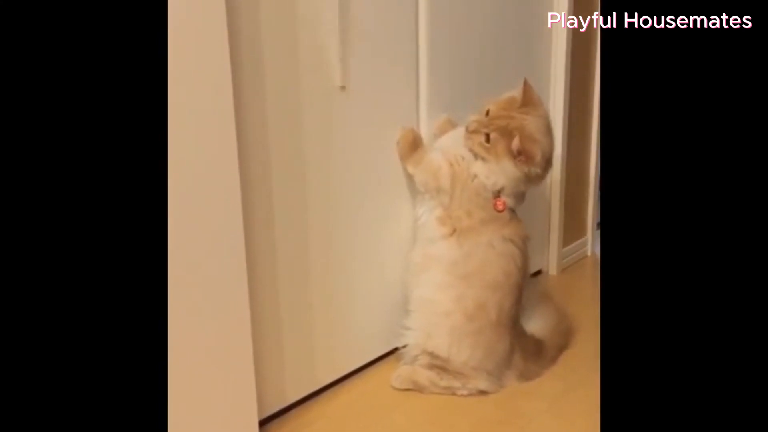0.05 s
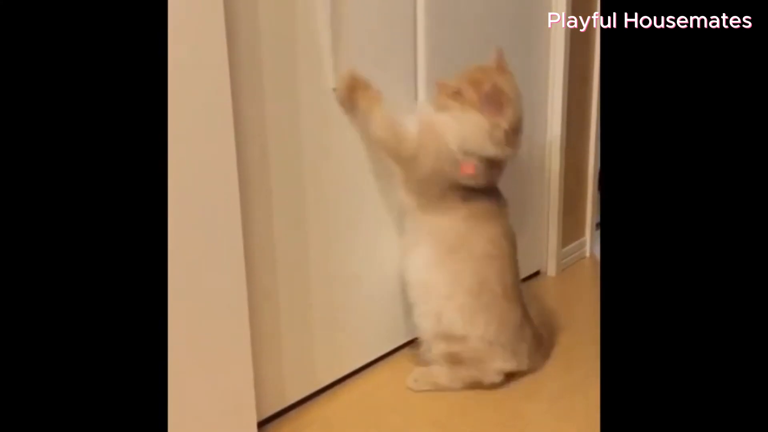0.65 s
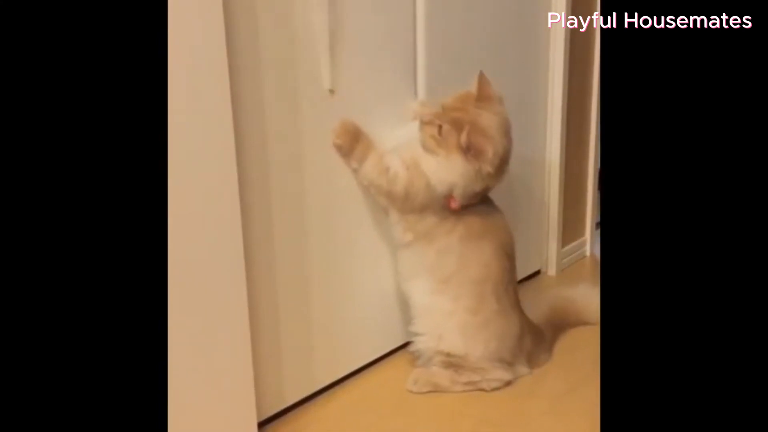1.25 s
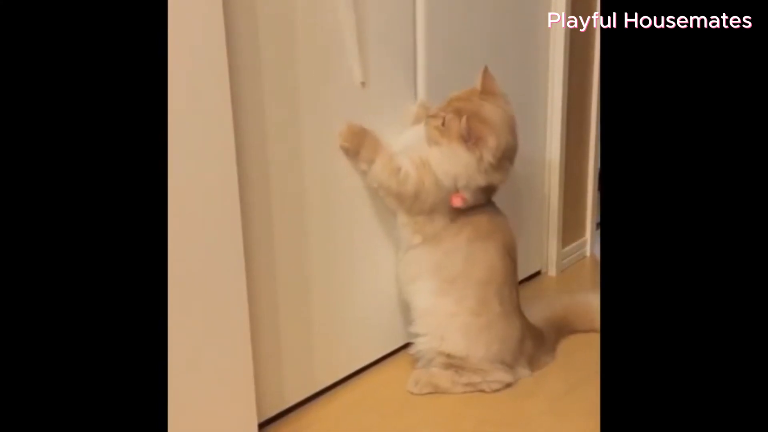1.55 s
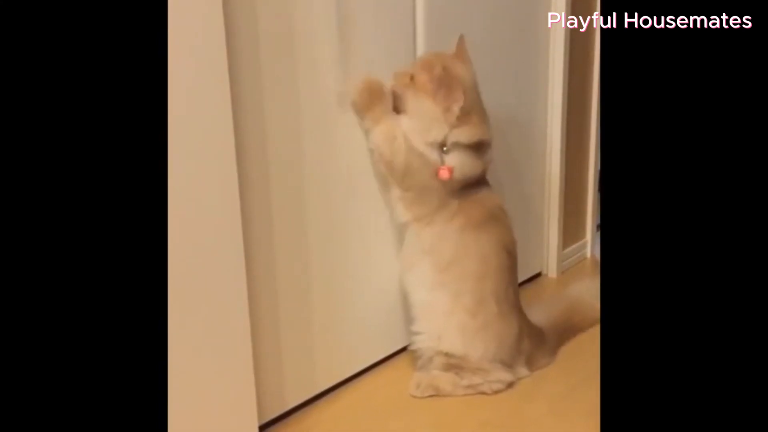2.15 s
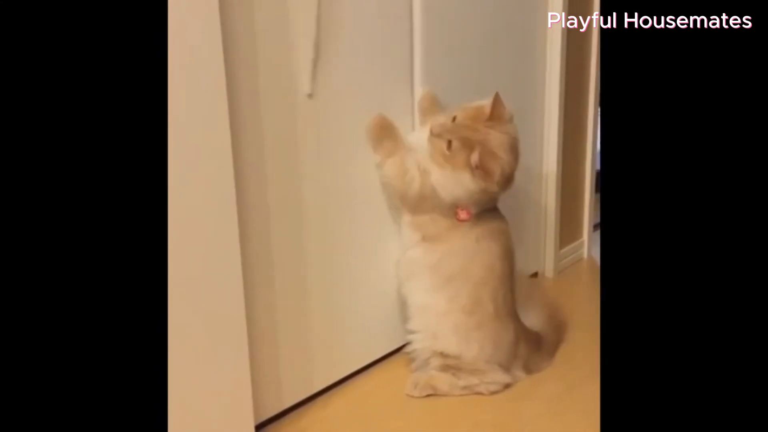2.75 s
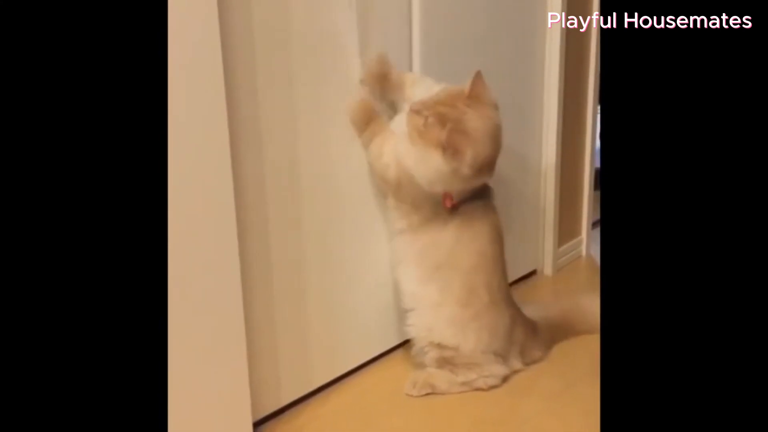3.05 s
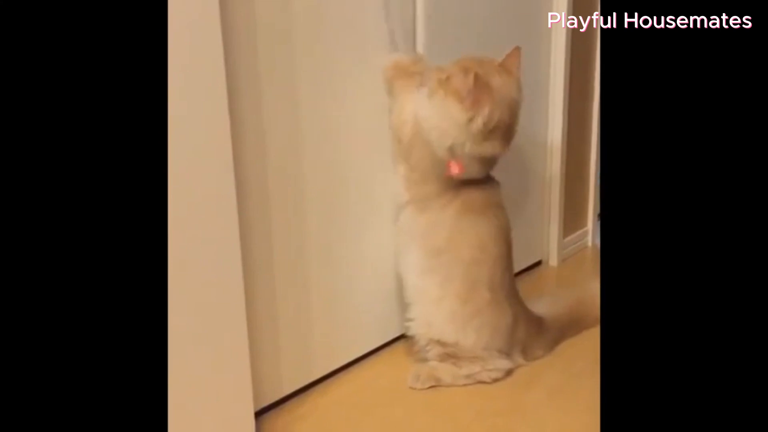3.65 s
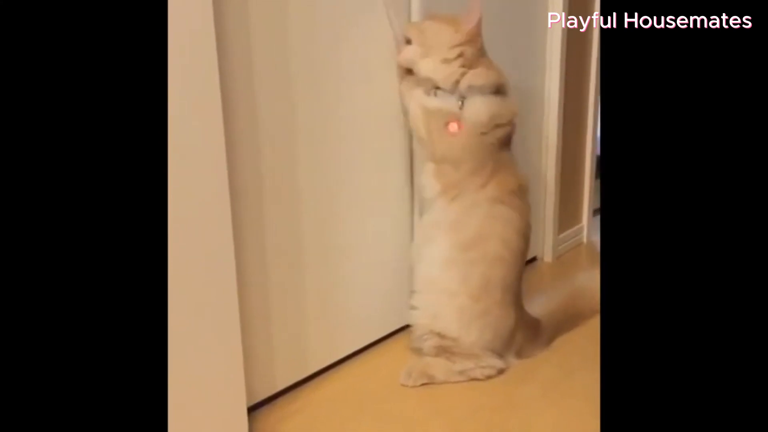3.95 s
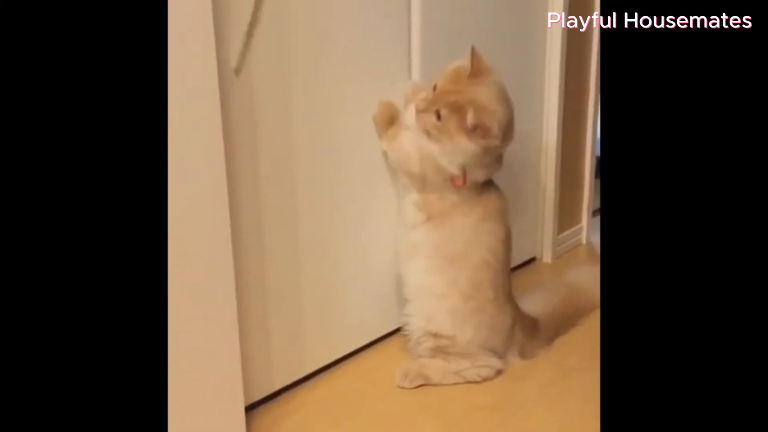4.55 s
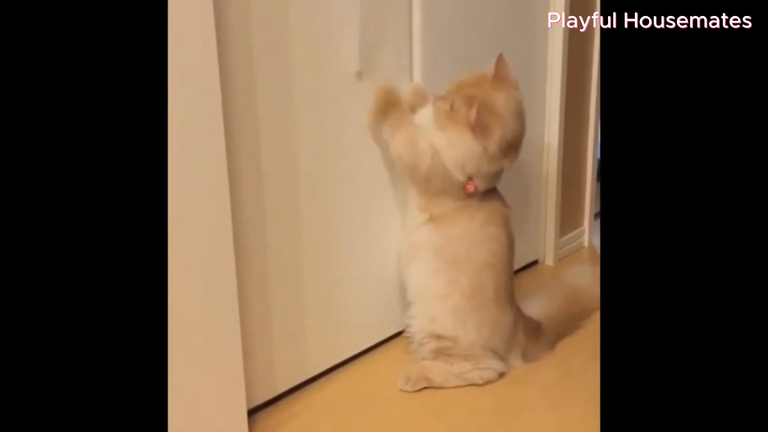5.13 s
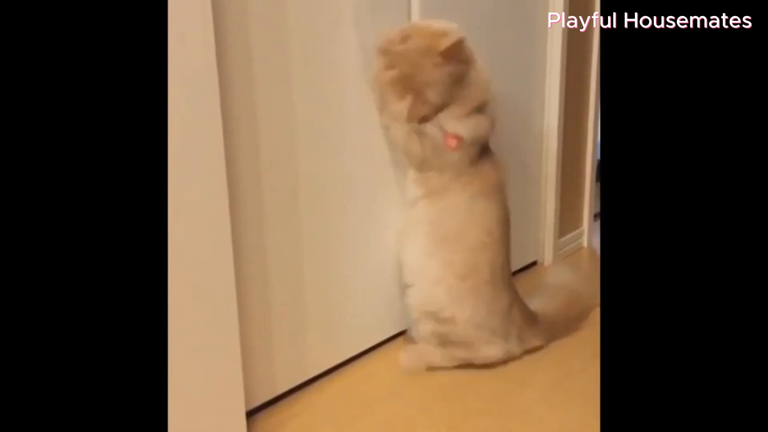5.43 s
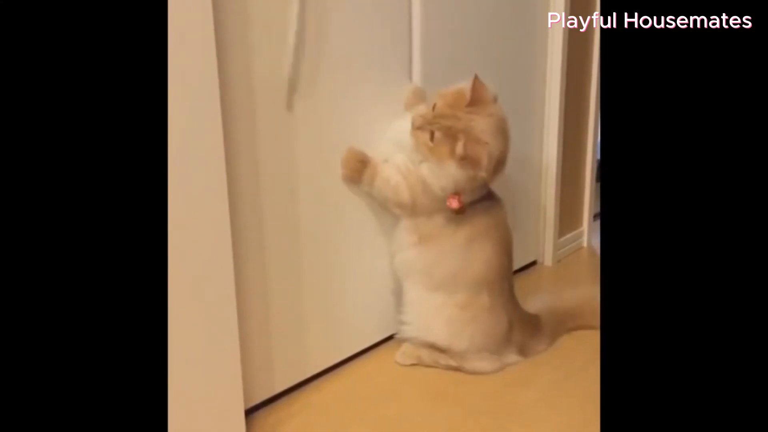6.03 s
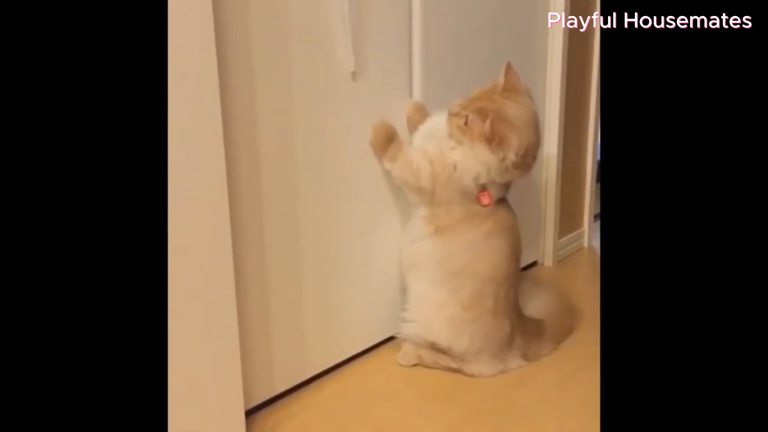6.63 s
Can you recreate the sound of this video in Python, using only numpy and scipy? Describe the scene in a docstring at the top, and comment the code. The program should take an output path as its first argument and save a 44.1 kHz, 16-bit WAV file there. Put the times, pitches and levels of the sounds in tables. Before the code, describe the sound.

A cat paws at a closet door in a small room, close to the microphone. Its claws scrape briefly and the hollow panel knocks in its track. A tiny, high collar bell rattles, then jingles freely in bursts among the knocks, then goes back to dull little rattles. Near the end a claw plucks the door's edge sharply three times. An appliance hums faintly throughout.

```python
"""A small room, one microphone near a closet door; an appliance hums under faint room noise throughout.
A cat starts pawing at the door: claws stick and slip, and the hollow panel knocks in its track.
From about 2 to 5 s the pellet bell on its collar swings free and rings among the knocks and scrapes.
Then it only rattles, as it does whenever it is pressed into the fur.
Towards the end a claw plucks the door's edge hard, three times."""
import sys
import numpy as np
from scipy import signal
from scipy.fft import rfft, irfft
from scipy.io import wavfile
from scipy.ndimage import uniform_filter1d

SR = 44100
rng = np.random.default_rng(int(sys.argv[2]) if len(sys.argv) > 2 else 0)


def dump(signal):
    """Clip the signal to [-1, 1] and save it as 16-bit WAV at the path in sys.argv[1]."""
    limited = np.clip(np.atleast_2d(signal).T, -1, 1)
    pcm = np.round(limited * 32767).astype(np.int16)
    wavfile.write(sys.argv[1], SR, pcm)


N = 303840
TIME = np.arange(N) / SR
AGE = TIME[:SR // 2]  # seconds since a blow
MIDDLE_S = AGE.mean()

# Paws knock the door. Each row: start in seconds, levels of clack, panel thump and hollow body in dB,
# t60 in seconds, clack centre in Hz.
KNOCKS = [(0.778, -55.5, -74, -83, 0.085, 1440), (0.9102, -47.5, -51.5, -58.5, 0.097, 1470),
          (0.9954, -52.5, -43.5, -55.5, 0.13, 1270), (1.7884, -47.5, -43, -58.5, 0.3, 1390),
          (1.9993, -29.5, -42.5, -38, 0.074, 1560), (2.2775, -50, -71, -62, 0.049, 2480),
          (2.4369, -51.5, -90, -60, 0.069, 2280), (3.1871, -31.5, -45, -46, 0.15, 1870),
          (3.713, -45.5, -80, -56.5, 0.037, 1900), (4.0068, -34.5, -47.5, -44, 0.051, 1830),
          (4.066, -48.5, -59, -58, 0.077, 1400), (4.5107, -72, -60, -74, .1, 2120),
          (4.6806, -40, -67, -52, 0.068, 1820), (4.994, -52, -93, -73, 0.075, 2420),
          (5.6174, -33.5, -60, -49, 0.037, 1520), (5.8257, -58, -57.5, -70.5, 0.22, 2000)]
# A paw drags over the door. Each row: strongest pull in seconds, build-up in seconds,
# levels of edge ring and claw rasp in dB.
SCRAPES = [(0.196, 0.12, -69, -96), (0.709, 0.011, -65.5, -88), (.826, 0.023, -51, -52),
           (0.914, 0.011, -52.5, -51.5), (1.45, 0.068, -69, -78), (1.824, 0.018, -57, -44.5),
           (1.908, 0.025, -55.5, -44.5), (2.93, 0.085, -78, -67.5), (3.056, 0.012, -43, -42),
           (3.091, 0.018, -58, -46), (3.382, 0.011, -54.5, -54), (3.576, 0.036, -61, -57.5),
           (3.691, 0.027, -72, -63.5), (4.074, 0.017, -51.5, -74), (5.411, 0.023, -75, -66),
           (5.81, 0.048, -67, -63), (6.87, 0.0098, -56, -58)]
# Single blows. Each row: start in seconds, level in dB.
PLUCKS = [(1.463, -37), (5.616, -24.5), (6.4173, -20.5), (6.8634, -24.5)]  # a claw on the door's edge
BUMPS = [(1.016, -51), (2.018, -58), (3.196, -53), (4.022, -60)]  # the whole door against its track
BELL_STRIKES = [(1.8154, -38.5), (1.879, -40.5), (2.0593, -34.5), (2.2074, -43.5), (3.2404, -38),
                (3.2795, -38), (3.297, -33.5), (3.3508, -38), (3.4083, -37.5), (3.475, -48),
                (3.5955, -43.5), (3.7315, -37.5), (3.7757, -41.5), (3.8332, -40), (3.9902, -39.5),
                (4.0306, -37.5), (4.1037, -32.5), (4.1351, -36), (4.1706, -42), (4.195, -33), (4.2581, -44),
                (4.384, -45.5), (4.7393, -40), (4.786, -47.5), (4.881, -45)]  # the pellet on the free shell
# The pellet rattles in the damped bell. Each row: start in seconds, length in seconds, level in dB.
RATTLES = [(0.708, .01, -63), (0.9835, .045, -58.5), (2.4, .01, -62), (3.033, .01, -45), (3.0974, .01, -44),
           (3.3842, .01, -54), (3.55, .01, -61), (4.418, .01, -58.5), (4.58, .01, -53.5), (4.636, .01, -60),
           (4.86, .01, -56.5), (5.288, .065, -58), (5.398, .01, -60), (5.588, .045, -55.5),
           (5.7075, .055, -40.5), (5.8274, .025, -40), (5.9976, .045, -49), (6.538, .01, -66),
           (6.63, .01, -61.5)]
# The free bell's changing brightness. Each row: time in seconds, then first overtone, second overtone
# and chatter in dB against the main tone.
OVERTONES = [(1.85, -28, -30, -34), (2.06, -24, -11.5, -14), (2.21, -30, -28, -21), (3.28, -15.5, -21, -11),
             (3.37, -10.5, -28, -16), (3.78, -17.5, -17, -19), (4.17, -19, -26, -16.5),
             (4.8, -25, -34, -11)]
# The room's low drone. Each row: time in seconds, level in dB.
DRONE_LEVELS = [(0.0, -63.5), (0.84, -59.5), (1.04, -50), (1.28, -63.5), (3.99, -62.5), (4.13, -57),
                (4.3, -62.5), (6.89, -66.5)]
# The appliance's hum. Each row: frequency in Hz, level in dB.
MOTOR_TONES = [(59.2, -59.5), (118.4, -54.5), (177.6, -69)]

# Ringing modes. Each row: frequency in Hz, level in dB, t60 in seconds.
PANEL_MODES = [(167.5, -10.5, 0.23), (207, 0.5, 0.086), (245.4, 3.5, 0.092), (268, -2.5, 0.093),
               (291.1, -1, 0.16), (316, -28, 0.15), (375, -4, 0.064), (475, -5.5, 0.062)]  # the door's face
EDGE_MODES = [(1450, 0, .027), (1540, -8, .026), (1330, -10, .02), (1950, -16, .02), (2600, -30, .016)]  # its edge
SWAY_MODES = [(40.2, -2, .35), (67.5, 8.5, 0.25), (89.7, -8, 0.43), (150, -3.5, 0.37)]  # the whole door
SHELL_MODES = [(5597, 0, .075), (5650, -10, .06), (8100, -24, .04)]  # the free bell

# Noise spectra. Each row: frequency in Hz, level in dB.
CLACK = [(900, -20), (1250, -3.5), (1450, 0), (1650, 0.5), (1900, 0.5), (2300, -1), (2800, -2),
         (3200, -0.5), (3600, -10.5), (6000, -15)]  # the door in its track
HOLLOW = [(200, -23), (380, -0.5), (600, -1), (780, -2), (1000, 2), (1250, -8), (1600, -13), (12000, -22)]  # its hollow body
CLAW_TICK = [(2200, -30), (3300, 3), (4100, 5.5), (5000, -0.5), (7000, -1.5), (9500, -3), (11000, -9),
             (14000, -16)]  # claw tips touching
EDGE_RUB = [(1000, -28), (1220, -15), (1330, -3), (1440, 0), (1560, -1), (1750, -10), (2200, -28),
            (9000, -44)]  # claws on the edge
FACE_RASP = [(500, -27), (1100, -14), (1500, -10), (1850, 3), (2180, 9), (2420, 2.5), (3100, -2),
             (3700, -13.5), (5000, -68)]  # claws on the face
PELLET_BUZZ = [(5000, -22.5), (5600, -3), (6100, -9), (7200, -18.5), (8000, -11), (9000, -16), (10500, -36),
               (12900, -23), (13300, -6), (14100, -29)]  # buzzing contact with the shell
PELLET_CHATTER = [(4000, -14), (5400, -10.5), (6200, 4.5), (7000, 2), (8300, 0), (9500, -3.5),
                  (10300, -8.5), (11000, -31), (12700, -18), (13800, -12), (14500, -20)]  # the pellet hopping and rolling
ROOM_RUMBLE = [(18, -32), (36, 4), (60, -3.5), (100, 8.5), (170, -1), (260, -26.5), (500, -57)]  # the low end of the room
ROOM_AIR = [(120, -24), (200, -4), (211, -6.5), (397, -7.5), (443, -10.5), (591, -12), (1330, -20.5),
            (1880, -19), (2060, -18), (12500, -28.5), (15000, -29.5)]  # its even hiss


def door_knocks(tick_slope=1.25):
    """A claw ticks, the door clacks in its track and its hollow panel thumps."""
    out = np.zeros(N)
    swell = 1 - np.exp(-AGE / 0.0013)
    for s, clack_db, thump_db, hollow_db, t60, centre_hz in KNOCKS:
        # the place of the blow decides which of the door's modes answer most
        spectrum = [(hz, db - 9 * np.log2(hz / centre_hz) ** 2) for hz, db in CLACK]
        clack = undb(clack_db) * burst(spectrum, t60)
        hollow = undb(hollow_db) * burst(HOLLOW, t60 * 1.26)
        tick_db = -46.5 + tick_slope * (clack_db + 38.5)  # harder blows are brighter
        tick = undb(tick_db) * bounce(burst(CLAW_TICK, t60 * 0.51), gap_s=0.0097, loss_db=14)
        thump = undb(thump_db) * ring(PANEL_MODES, detune=0.022)
        add(out, s, (clack + hollow + thump) * swell + tick)
    return out


def claw_scrapes(slips_per_s=2200, scatter_db=3, catch_db=1.0, release_share=0.49):
    """The pull builds and lets go while claws stick and slip, ringing the edge and rasping the face."""
    out = np.zeros(N)
    size = len(AGE)
    from_peak = AGE - MIDDLE_S
    for s, build_s, edge_db, rasp_db in SCRAPES:
        slips = (rng.random(size) < slips_per_s / SR) * rng.choice([-1, 1], size)
        slips = slips * undb(scatter_db * rng.standard_normal(size))
        door = undb(edge_db) * colour(slips, EDGE_RUB) + undb(rasp_db) * colour(slips, FACE_RASP)
        # claws hiss more on the flat face than hooked on the edge
        hiss_db = rasp_db - 16.5 + 0.86 * (rasp_db - edge_db)
        hiss = undb(hiss_db) * colour(slips, CLAW_TICK)
        width_s = np.where(from_peak < 0, build_s, build_s * release_share)
        pull = np.exp(-np.abs(from_peak / width_s) ** 1.2)  # a fairly pointed peak
        add(out, s - MIDDLE_S, (door + hiss) * pull)
    return out * undb(catch_db * wander(90))


def edge_plucks(swell_s=.006):
    """A claw plucks the door's edge and sets it ringing."""
    out = np.zeros(N)
    swell = 1 - np.exp(-(AGE / swell_s) ** 2)
    for s, db in PLUCKS:
        add(out, s - .001, undb(db) * ring(EDGE_MODES, detune=0.00094) * swell)
    return out


def door_sway():
    """The whole door sways against its track with a deep bump."""
    out = np.zeros(N)
    for s, db in BUMPS:
        add(out, s, undb(db) * ring(SWAY_MODES, detune=0.054))
    return out


def free_bell(buzz_db=-15, roll_db=-18, fall_back_s=0.078, fall_back_db=-22, flicker_db=2):
    """The pellet rolls up the slit shell, hits, hops and falls back; its buzzing widens the tones."""
    out = np.zeros(N)
    swell = 1 - np.exp(-AGE / 0.0034)
    times, *levels = np.transpose(OVERTONES)
    main_tone_band = [(5250, -45), (5540, -6), (5600, 0), (5660, -6), (6000, -45)]
    for s, db in BELL_STRIKES:
        first_db, second_db, chatter_db = (np.interp(s, times, level) for level in levels)
        shell = ring(SHELL_MODES, detune=0.0013)
        buzz = undb(buzz_db) * burst(PELLET_BUZZ, t60=0.072)
        chatter = undb(chatter_db) * burst(PELLET_CHATTER, t60=0.058)
        first = ring([(13162, first_db, 0.17)], detune=.0008)
        second = ring([(13605, second_db, 0.17)], detune=.0012)
        blow = bounce((shell + buzz + chatter + first + second) * swell, gap_s=.008, loss_db=13)
        add(out, s - .002, undb(db) * blow)
        add(out, s + fall_back_s * (1 + 0.36 * rng.standard_normal()), undb(db + fall_back_db) * blow)
        add(out, s + .004 - MIDDLE_S, undb(db + roll_db) * pellet_roll(main_tone_band, width_s=0.011))
    # the tumbling bell turns its slit towards and away from the microphone
    return out * undb(flicker_db * wander(110))


def damped_bell(hop_s=.02, jitter_s=.002, sag_db_per_s=80, scatter_db=3.0, roll_db=-4):
    """Held by fur, the shell rings higher and very briefly; the pellet rolls and hops until it settles."""
    out = np.zeros(N)
    swell = 1 - np.exp(-AGE / 0.0011)
    for start, length, level_db in RATTLES:
        for since in np.arange(0, length, hop_s):
            late, hard = rng.standard_normal(2) * (since > 0)
            s = start + since + jitter_s * late
            db = level_db - sag_db_per_s * since + scatter_db * hard
            chatter_db = -58 + 0.74 * (db + 47)  # chatter grows more slowly than the tone
            shell = ring([(6295, 4, 0.025), (6270, -8.5, 0.049)], detune=0.0042)
            hop = undb(db) * shell + undb(chatter_db) * burst(PELLET_CHATTER, t60=0.035)
            add(out, s, bounce(hop * swell, gap_s=.009, loss_db=7.5))
            roll = pellet_roll(PELLET_CHATTER, width_s=0.012)
            add(out, s + 0.0058 - MIDDLE_S, undb(chatter_db + roll_db) * roll)
    return out


def pellet_roll(spectrum, width_s):
    """The pellet rolls along the shell: noise that swells to a peak at MIDDLE_S and falls away."""
    swell = np.exp(-.5 * ((AGE - MIDDLE_S) / width_s) ** 2)
    return colour(rng.standard_normal(len(AGE)), spectrum) * swell


def small_room(x, wet_db):
    """Near walls and a bare floor return a short tail to the microphone."""
    body = burst([(60, 8), (300, 7.0), (3000, -4.0), (5500, 4.5), (14000, -17)], t60=0.28)
    treble = burst([(2000, -15.5), (5000, -11), (14000, -10.5)], t60=0.29)
    tail = (body + 1.32 * treble) * (AGE > .005)
    return x + undb(wet_db) * signal.fftconvolve(x, tail / np.linalg.norm(tail))[:N]


def room_tone():
    """A motor hums and wavers; its lowest tone swells and sinks with the rumble, under even hiss."""
    drone_db = np.interp(TIME, *np.transpose(DRONE_LEVELS))
    tones = []
    for hz, db in MOTOR_TONES:
        amplitude = np.sqrt(2) * undb(db + 0.5 * wander(7.7))
        phase = 2 * np.pi * (hz * TIME + rng.random()) + 0.032 * wander(1.6)
        tones.append(amplitude * np.sin(phase))
    hum = tones[0] * undb(drone_db - np.median(drone_db)) + sum(tones[1:])
    rumble = undb(drone_db + 2.3 * wander(3.0)) * colour(rng.standard_normal(N), ROOM_RUMBLE)
    hiss = undb(-70) * colour(rng.standard_normal(N), ROOM_AIR)
    return hum + rumble + hiss


def ring(modes, detune):
    """One blow on (Hz, dB, t60) modes; each blow lands a little differently."""
    out = np.zeros(len(AGE))
    for hz, db, t60 in modes:
        struck_hz = hz * (1 + detune * rng.standard_normal())
        out += undb(db) * fade(t60) * np.sin(2 * np.pi * struck_hz * AGE)
    return out


def burst(spectrum, t60):
    """A crowd of close modes dying away together."""
    return colour(rng.standard_normal(len(AGE)), spectrum) * fade(t60)


def bounce(x, gap_s, loss_db, count=4):
    """A blow and weaker rebounds at uneven gaps, at about the energy of the blow alone."""
    lags = np.append(0, np.cumsum(gap_s * (.5 + rng.random(count)))) * SR
    gains = undb(-loss_db * np.arange(count + 1))
    blows = sum(gain * np.pad(x, (int(lag), 0))[:len(x)] for lag, gain in zip(lags, gains))
    return blows / np.linalg.norm(gains)


def fade(t60):
    """The decay of a struck thing, 60 dB down after t60 seconds."""
    return np.exp(-np.log(1000) * AGE / t60)


def colour(x, spectrum):
    """Shape x with a (Hz, dB) spectrum, at rms 1."""
    hz, db = np.transpose(spectrum)
    bins_hz = np.maximum(np.fft.rfftfreq(len(x), 1 / SR), 1)
    gain = undb(np.interp(np.log(bins_hz), np.log(hz), db))
    return unit(irfft(rfft(x) * gain, len(x)))


def wander(rate_hz):
    """A smooth random drift, at rms 1."""
    size = int(SR / rate_hz)
    steps = np.repeat(rng.standard_normal(N // size + 1), size)
    return unit(uniform_filter1d(uniform_filter1d(steps, size), size)[:N])


def add(out, s, x):
    """Mix x into out from s seconds on, or from the start if s is negative."""
    i = max(int(s * SR), 0)
    out[i:i + len(x)] += x[:max(N - i, 0)]


def undb(db):
    """Decibels to gain."""
    return 10 ** (np.asarray(db) / 20)


def unit(x):
    """Scale to rms 1."""
    return x / np.sqrt(np.mean(x ** 2))


def scene():
    """The bell reaches the microphone mostly direct, while the broad door drives more of the room."""
    bell = small_room(free_bell() + damped_bell(), wet_db=-10)
    door = small_room(door_knocks() + door_sway() + edge_plucks() + claw_scrapes(), wet_db=-4)
    return (door + bell + room_tone())[None]


def record(dry):
    """The microphone drops the bass below 20 Hz and the recorder cuts the top above 14.1 kHz."""
    heard = signal.sosfilt(signal.butter(3, 20, "highpass", fs=SR, output="sos"), dry)
    return signal.sosfilt(signal.ellip(8, .2, 60, 14100, fs=SR, output="sos"), heard)


dry = scene()
out = record(dry)
dump(out)
```